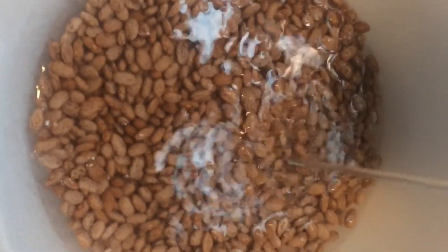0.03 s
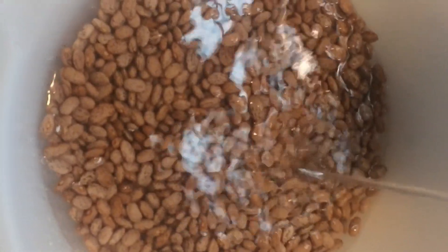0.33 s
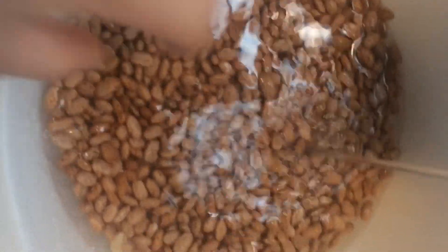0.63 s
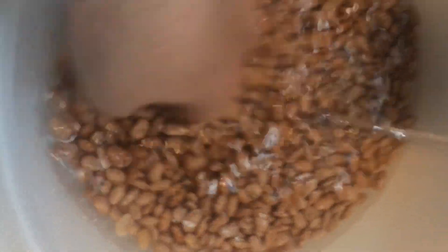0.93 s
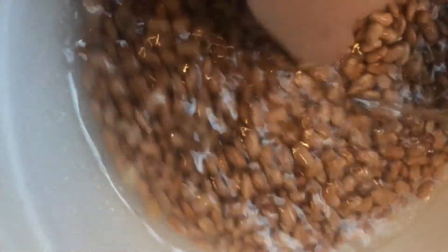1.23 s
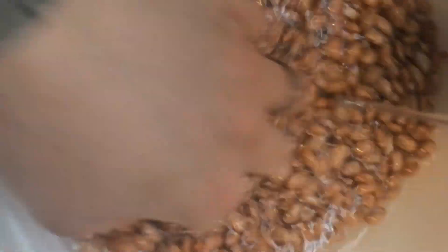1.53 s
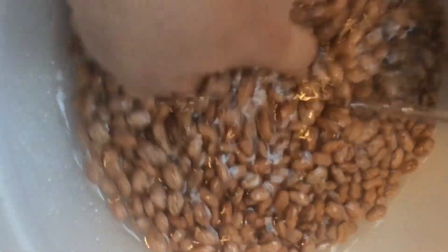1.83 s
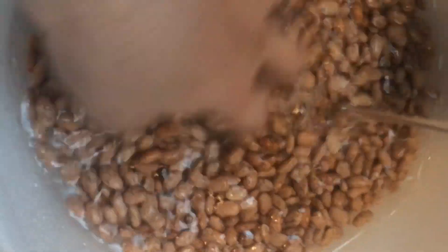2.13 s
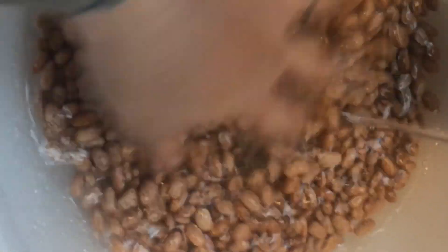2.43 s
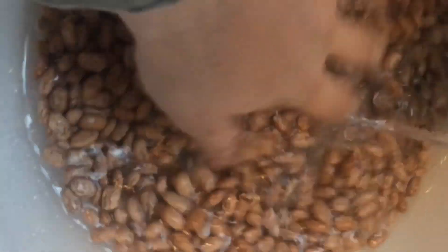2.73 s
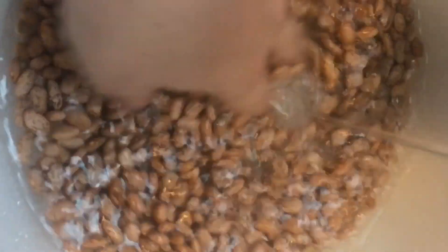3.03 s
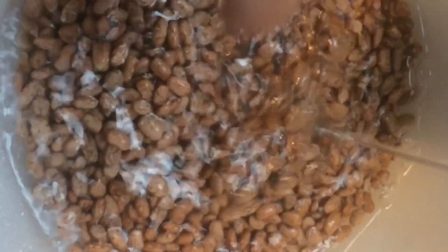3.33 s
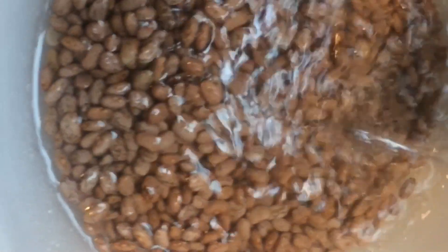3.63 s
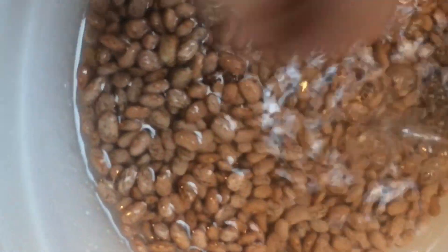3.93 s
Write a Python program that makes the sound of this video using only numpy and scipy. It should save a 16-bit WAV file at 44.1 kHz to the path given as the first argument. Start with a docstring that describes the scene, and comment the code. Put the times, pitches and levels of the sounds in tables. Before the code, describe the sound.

Close up in a kitchen, tap water trickles and spits into a plastic tub of beans. Midway, a hand swirls the wet beans with a dense rattle and soft bumps, then the stream carries on alone.

```python
"""A kitchen: a thin stream of tap water falls into a plastic tub of dried beans, spitting and plopping. The
splash is a spray of tiny ringing bubbles, over the drumming of the stream that rings the tub. From about 0.9 to
3.3 s a hand stirs the beans: they rattle, the water sloshes and the tub is bumped. The hollow of the tub
colours water and beans; room tone and a faint mains hum sit underneath."""
import sys
import numpy as np
from scipy import signal
from scipy.fft import rfft, irfft
from scipy.io import wavfile

SR = 44100
rng = np.random.default_rng(int(sys.argv[2]) if len(sys.argv) > 2 else 0)


def wav_record(signal):
    """Record a signal, one row per channel, as 16-bit PCM in the file named by sys.argv[1]."""
    frames = np.transpose(np.atleast_2d(signal))
    bounded = np.clip(frames, -1, 1)
    # unit amplitude maps onto the largest positive 16-bit level
    quanta = np.round(bounded * 32767).astype(np.int16)
    wavfile.write(sys.argv[1], SR, quanta)


N = 176400
T = np.arange(N) / SR
CUTOFF_HZ = 16000

# fader of the splashing stream: (time [s], level [dB])
STREAM_FADER = [(0, -31), (.09, -29.5), (.14, -30.5), (.23, -32), (.3, -38.5), (.42, -32), (.53, -31.5),
                (.57, -33.5), (.62, -32.5), (.73, -33.5), (.82, -40.5), (.9, -33.5), (3.2, -30.5),
                (3.3, -31), (3.5, -38), (3.79, -28), (3.87, -45.5), (3.97, -31)]
# tone of the splash: (frequency [Hz], level per octave [dB])
STREAM_COLOUR = [(250, -22), (450, -42), (600, -10), (1000, -1), (1700, 0), (2600, 3), (4000, 6.5),
                 (5000, -0.5), (7000, 0), (11000, 1), (16000, -9)]
# sharp spits: (time [s], level [dB], pitch [Hz], sweep [octaves per snap width], knock level [dB])
POPS = [(0.0979, -10.0, 7800.0, 0.5, -22.0), (0.2097, -14.0, 9100.0, 0.9, -21.0),
        (0.3841, -12.0, 11300.0, 0.5, -28.0), (0.4492, -11.0, 9600.0, 0.6, -21.0),
        (0.4847, -6.0, 6900.0, 0.7, -14.0), (0.4955, -14.0, 5800.0, 0.6, -16.0),
        (0.5077, -14.0, 10300.0, 0.6, -30.0), (0.6159, -5.0, 7300.0, 0.4, -18.0),
        (0.6475, -6.0, 7400.0, 0.6, -21.0), (0.8623, -11.0, 6700.0, 1.0, -18.0),
        (0.8769, -11.0, 7200.0, 0.3, -29.0), (0.9015, -9.0, 6000.0, 0.8, -11.0),
        (1.751, -1.0, 8100.0, 0.4, -17.0), (1.7714, -9.0, 9100.0, 0.5, -19.0),
        (2.1747, -6.0, 6400.0, 0.4, -22.0), (2.3599, -5.0, 10100.0, 0.4, -19.0),
        (2.4995, -8.0, 5900.0, 0.5, -16.0), (2.6152, -7.0, 8200.0, 0.9, -16.0),
        (2.628, -2.0, 10800.0, 0.4, -18.0), (2.7815, -8.0, 6500.0, 0.5, -15.0),
        (3.0344, -8.0, 8400.0, 0.6, -28.0), (3.196, -1.0, 8500.0, 0.4, -15.0),
        (3.4029, -6.0, 7200.0, 0.4, -23.0), (3.4594, -5.0, 8100.0, 0.5, -30.0),
        (3.6081, 1.0, 9800.0, 0.5, -16.0), (3.6285, -9.0, 10900.0, 0.6, -19.0),
        (3.7658, -6.0, 5300.0, 0.8, -7.0), (3.9439, -4.0, 8600.0, 1.0, -10.0)]
POP_TRIM_DB, TICK_DB, SNAP_WIDTH_S = -2, 9, 0.000247
# larger air pockets closing: (time [s], level [dB], pitch [Hz])
PLOPS = [(0.0346, -15, 780), (0.259, -9, 1180), (0.4867, -8, 1340), (0.6335, -3.5, 850), (0.7149, -3, 950),
         (0.863, -9, 1070), (0.9026, -12, 970), (0.9239, -10, 940), (1.0266, -3.5, 800),
         (1.1836, -9.5, 1240), (1.3094, -7, 990), (1.5422, -1, 1310), (1.6173, -5.5, 940),
         (1.6402, -8, 1300), (1.7356, -9.5, 900), (1.7953, -13, 710), (1.8606, -8, 1170),
         (2.1433, -5.5, 1250), (2.1754, -7.5, 764), (2.3377, -7, 806), (2.3908, -3, 860),
         (2.4832, -2.5, 965), (2.639, -12, 1330), (2.71, -4.5, 1340), (3.167, -3, 1340),
         (3.6007, -3.5, 1270), (3.6615, -5.5, 1390), (3.7667, -6.5, 1160), (3.8453, -4.5, 1200),
         (3.9441, -4.5, 980)]
PLOP_TRIM_DB, PLOP_CYCLES = -11, 0.86
# deep gulps around the hand: (time [s], level [dB], pitch [Hz])
GULPS = [(0.999, -41, 292), (1.777, -25.5, 290), (1.795, -29, 294), (2.249, -34, 295), (2.49, -52, 270)]
# single bubbles that ring out: (time [s], level [dB], pitch [Hz], swell [cycles])
PINGS = [(0.2001, -16.0, 3150.0, 3.0), (0.2591, -19.0, 6700.0, 6.8), (0.5318, -17.0, 3360.0, 3.5),
         (0.6157, -9.0, 7000.0, 2.8), (0.6792, -12.0, 2570.0, 2.0), (0.6974, -14.0, 2820.0, 2.5),
         (0.7129, -15.0, 3050.0, 2.2), (1.878, -10.0, 3540.0, 2.0), (2.1746, -12.0, 6300.0, 5.1),
         (2.9274, -13.0, 3880.0, 5.9), (2.9371, -12.0, 2650.0, 5.7), (2.9807, -10.0, 2900.0, 2.2),
         (3.4029, -12.0, 7250.0, 3.6), (3.7657, -8.0, 3800.0, 2.7)]
# upper ringing modes of the tub, struck by the stream: (frequency [Hz], level [dB], t60 [s])
UPPER_TUB_MODES = [(618, -14, 0.051), (1130, -7.5, 0.079), (1217, -1.5, 0.057), (1425, -8.5, 0.073),
                   (2198, -4, 0.069), (2273, -3.5, 0.051), (2850, 1.5, 0.018), (3860, -9, 0.024)]
# fader of the stream's drumming on those modes: (time [s], level [dB])
PATTER_FADER = [(0, -31.5), (.3, -44), (.8, -35), (1.2, -45), (2.4, -38.5), (3.1, -44.5), (3.3, -30.5),
                (3.5, -34.5), (3.8, -32.5), (3.88, -35.5), (3.97, -27.5)]
# the stream's hardest hits on the tub's upper modes: (time [s], level [dB], boost of the upper modes [dB])
BLOWS = [(0.082, -35, 13), (0.602, -19, 1.5), (0.679, -24, 5), (3.166, -22, 6.5), (3.282, -16.5, -1.5),
         (3.314, -26, 6), (3.348, -20.5, 3.5), (3.384, -25.5, 11.5), (3.42, -19.5, -3), (3.539, -21.5, 4.5),
         (3.563, -23.5, 9), (3.6, -23.5, 6.5), (3.646, -26.5, 0.0), (3.661, -28.5, 10), (3.677, -20.5, -8),
         (3.711, -16.5, 0), (3.742, -26.0, 1), (3.766, -17, -2), (3.785, -28, 1), (3.801, -21.5, 1.5),
         (3.844, -16, -18), (3.928, -27, 3), (3.942, -28, 12), (3.984, -25, -2)]

# fader of the bean rattle: (time [s], level [dB])
STIR_FADER = [(0, -36.5), (.86, -40), (.96, -33.5), (1.12, -29), (1.25, -32), (1.3, -30.5), (1.53, -27),
              (1.68, -30.5), (1.78, -29), (1.9, -31.5), (1.99, -25), (2.14, -33), (2.24, -32.5),
              (2.46, -28), (2.54, -24), (2.6, -31.5), (2.66, -25), (2.73, -32.5), (2.8, -21), (2.88, -28),
              (2.94, -26.5), (3.03, -27.5), (3.22, -30), (3.45, -40.5), (4, -46)]
# tone of the rattle: (frequency [Hz], level per octave [dB])
RATTLE_COLOUR = [(300, -18.5), (600, -12.5), (1100, -4), (1600, 1), (3000, 2.5), (5000, -2), (7000, 0.5),
                 (11000, -12), (16000, -9)]
# tone of the clear bubbles among the beans: (frequency [Hz], level per octave [dB])
BLIP_COLOUR = [(900, 6.5), (1700, 6.5), (3000, 7.5), (4200, 6.5), (5200, -17), (9000, -30)]
# fader of the water sloshing round the hand: (time [s], level [dB])
SLOSH_FADER = [(0, -60), (.88, -44.5), (1.01, -29.5), (1.12, -34.5), (1.24, -41), (1.4, -35), (1.6, -36),
               (1.7, -37.5), (1.79, -28), (1.9, -40), (2.02, -34.5), (2.14, -35), (2.27, -32.5),
               (2.56, -29.5), (2.72, -45), (2.82, -41), (3.12, -32.5), (3.4, -43.5), (4, -51)]
# tone of the slosh: (frequency [Hz], level per octave [dB])
SLOSH_COLOUR = [(200, -30), (270, 0.5), (330, -5), (430, -13.5), (600, -0.5), (900, 2), (1400, 7),
                (2200, -1)]
# fingers pushing through: (time [s], length [s], level [dB], centre pitch [Hz])
SWISHES = [(0.949, 0.026, -28, 2600), (1.305, 0.024, -32, 4000), (1.516, 0.09, -31, 1960),
           (2.233, 0.041, -28, 1730), (2.542, 0.061, -30.5, 1980), (2.804, 0.082, -32, 2350),
           (2.927, 0.049, -24.5, 2920)]
# the hand bumps the tub: (time [s], level [dB])
BUMPS = [(0.382, -43), (0.896, -34), (1.778, -31.5), (1.985, -41), (2.229, -33.5), (2.289, -37),
         (2.822, -31), (3.08, -30)]
# low modes of the filled tub: (frequency [Hz], level [dB], t60 [s])
TUB_MODES = [(53, -4, 0.28), (76.5, -2, 0.23), (101.5, 8, 0.14), (127, -20, .12)]
# low end of the stirred mass: (frequency [Hz], level per Hz [dB])
RUMBLE_COLOUR = [(20, -30), (35, -41), (50, -6), (85, 2.5), (125, 1), (160, -9), (200, -10), (400, -23),
                 (2000, -70)]

# air resonances of the tub: (frequency [Hz], width [Hz], level [dB])
HOLLOW_MODES = [(295, 57, -4), (588, 62, 9.5), (743.6, 6.8, 4.5), (897, 25, 0.5), (1134, 36, -9.5),
                (1205, 114, -2), (2226, 43, -6)]
WALLS_T60_S, KITCHEN_T60_S, KITCHEN_DB = 0.026, 0.18, -16.5
# room tone of the kitchen: (frequency [Hz], level per Hz [dB])
ROOM_COLOUR = [(20, -22), (50, -9), (80, 5), (125, -12), (160, -3), (300, -12.5), (1000, -2), (4000, -17),
               (16000, -43)]
ROOM_DB, HUM_HZ, HUM_DB = -48.5, 120, -64


def stream():
    """Each splash of the stream makes a bunch of short-lived bubbles."""
    splashes = bursts(per_s=95, members=22, spread_s=.0022, burst_db=4, member_db=4)
    return level(STREAM_FADER) * grains(*splashes, STREAM_COLOUR, cycles=1.5, rise=.024, count=30)


def pops():
    """Tiny cavities snap open with a lower knock; faint ticks in between follow the stream's level."""
    out = np.zeros(N)
    for (s, db, hz, sweep, knock_db), (turn, knock_turn, octaves) in zip(POPS, rng.random((len(POPS), 3))):
        add(out, s - .001, from_db(db + POP_TRIM_DB) * in_tub(snap(hz, sweep, turn), walls_db=-8))
        knock = bubble(2100 * 2 ** octaves, cycles=1.2, rise=.1, turn=knock_turn)
        add(out, s - .0005, from_db(knock_db + POP_TRIM_DB) * in_tub(knock))
    flow = level(STREAM_FADER)
    for when, octaves, turn, strength in rng.random((180, 4)):
        tick = snap(7000 * 2 ** octaves, sweep=.51, turn=turn)
        add(out, when * N / SR, from_db(TICK_DB) * strength * flow[int(when * N)] * tick)
    return out


def plops():
    """Larger pockets of air ring briefly; the deepest gulp around the hand."""
    out = np.zeros(N)
    for s, db, hz in PLOPS:
        plop = in_tub(bubble(hz, PLOP_CYCLES, rise=.049, turn=rng.random()))
        add(out, s - PLOP_CYCLES / hz, from_db(db + PLOP_TRIM_DB) * plop)  # peaks on the cue
    for s, db, hz in GULPS:
        add(out, s, from_db(db) * bubble(hz, cycles=1.17, rise=.011, turn=rng.random()))
    return out


def pings(trim_db=-1):
    """Freed bubbles ring with a clear, slightly rising note."""
    out = np.zeros(N)
    for s, db, hz, cycles in PINGS:
        ping = bubble(hz, cycles, rise=.044, turn=rng.random())
        add(out, s - cycles / hz, from_db(db + trim_db) * in_tub(ping, walls_db=-8))
    return out


def patter():
    """The stream breaks into quick blows that ring the tub's upper modes."""
    times, db = bursts(per_s=45, members=1, spread_s=.001, burst_db=3.5, member_db=1)
    out, t = np.zeros(N), T[:SR // 10]
    for hz, mode_db, t60 in UPPER_TUB_MODES:
        hits = clicks(times, from_db(db + mode_db + rng.normal(0, 2.8, len(db))))
        out += signal.oaconvolve(hits, ring(t, hz, t60))[:N]
    return level(PATTER_FADER) * rms_one(bass_cut(out))


def blows(trim_db=-3):
    """Hard blows give the tub's upper modes a tighter ring, each with its own brightness."""
    out, t = np.zeros(N), T[:SR // 10]
    for s, db, upper_db in BLOWS:
        for hz, mode_db, t60 in UPPER_TUB_MODES:
            bright_db = upper_db * np.clip(np.log2(hz / UPPER_TUB_MODES[2][0]), 0, 1)
            detuned_hz = hz * (1 + .01 * rng.standard_normal())
            add(out, s, from_db(db + mode_db + bright_db) * ring(t, detuned_hz, .67 * t60))
    return from_db(trim_db) * bass_cut(out)


def bass_cut(x, hz=710):
    """The ringing blows and patter carry little bass."""
    return signal.sosfilt(signal.butter(2, hz, "high", fs=SR, output="sos"), x)


def stirring(rattle_db=-1, blip_db=-10.5):
    """Wet beans knock in a dense rattle, single bubbles ring out and the water sloshes."""
    knocks = bursts(per_s=350, members=10, spread_s=.01, burst_db=2, member_db=3)
    rattle = from_db(rattle_db) * grains(*knocks, RATTLE_COLOUR, cycles=2.6, rise=.04, count=32)
    bubbles = bursts(per_s=110, members=2, spread_s=.01, burst_db=1, member_db=4)
    blips = from_db(blip_db) * grains(*bubbles, BLIP_COLOUR, cycles=6, rise=.05, count=22)
    laps = bursts(per_s=90, members=8, spread_s=.008, burst_db=.5, member_db=.5)
    slosh = grains(*laps, SLOSH_COLOUR, cycles=2.8, rise=.038, count=22)
    return level(STIR_FADER) * (rattle + blips) + level(SLOSH_FADER) * slosh


def swishes(count=70):
    """Water squeezed between the beans frees a cloud of bubbles of similar size."""
    out = np.zeros(N)
    for s, length_s, db, hz in SWISHES:
        cloud = np.zeros(N)
        for when, detune, turn in np.clip(rng.standard_normal((count, 3)), -2, 2):
            blip = bubble(hz * 2 ** (.4 * detune), cycles=2.8, rise=.06, turn=turn)
            add(cloud, s + when * length_s / 3, blip)
        out += from_db(db) * cloud * np.sqrt(length_s * SR / np.sum(cloud ** 2))
    return out


def bumps(attack_s=.029):
    """Soft pushes set the heavy tub ringing low."""
    out, t = np.zeros(N), T[:SR // 2]
    attack = 1 - np.exp(-t / attack_s)
    for s, db in BUMPS:
        for hz, mode_db, t60 in TUB_MODES:
            add(out, s, from_db(db + mode_db) * attack * ring(t, hz, t60, rng.random()))
    return out


def rumble(trim_db=-23.5):
    """The stirred mass rumbles, riding the same fader as the rattle."""
    return from_db(trim_db) * level(STIR_FADER) * noise(RUMBLE_COLOUR)


def tub_ring(trim_db=-29):
    """Each plop sets the tub's air ringing, most near its own pitch."""
    out, t = np.zeros(N), T[:SR // 5]
    for s, db, hz in PLOPS:
        for mode_hz, _, _ in HOLLOW_MODES:
            nearness = np.exp(-2 * np.log2(mode_hz / hz) ** 2)
            add(out, s, nearness * from_db(db + trim_db) * ring(t, mode_hz, t60=.11))
    return out


def in_tub(wave, walls_db=-4):
    """Every spot in the tub has its own reflections from the walls."""
    path = from_db(walls_db) * echoes(WALLS_T60_S, delay_s=.00065)[:SR // 20]
    path[0] = 1  # the direct sound
    return signal.fftconvolve(wave, path)


def tub_and_kitchen(x):
    """The hollow of the tub rings and the room throws the sound back."""
    out = x.copy()
    for hz, width_hz, db in HOLLOW_MODES:
        out += from_db(db) * signal.lfilter(*signal.iirpeak(hz, hz / width_hz, fs=SR), x)
    reverb = signal.fftconvolve(out, echoes(KITCHEN_T60_S, delay_s=.0051))[:N]
    return out + from_db(KITCHEN_DB) * reverb


def room_tone():
    """A steady bed of soft noise and faint mains hum."""
    hum = np.sqrt(2) * np.sin(2 * np.pi * HUM_HZ * T)
    return from_db(ROOM_DB) * noise(ROOM_COLOUR) + from_db(HUM_DB) * hum


def bubble(hz, cycles, rise, turn):
    """A sine that swells for `cycles` and dies away while its pitch rises; `turn` is its phase."""
    age = np.arange(int(7 * cycles / hz * SR) + 2) / SR * hz / cycles  # 1 at the peak
    pitch = np.minimum(hz * (1 + rise) ** (np.minimum(age, 3) - 1), .45 * SR)
    return (age * np.exp(1 - age)) ** 2 * np.sin(2 * np.pi * (np.cumsum(pitch) / SR + turn))


def snap(hz, sweep, turn):
    """A brief upward chirp, centred on 1 ms."""
    widths = (T[:SR // 500] - T[SR // 1000]) / SNAP_WIDTH_S
    pitch = np.minimum(hz * 2 ** (sweep * widths), SR / 2)
    return np.exp(-widths ** 2 / 2) * np.sin(2 * np.pi * (np.cumsum(pitch) / SR + turn))


def ring(t, hz, t60, turn=0):
    """One struck mode dying away."""
    return from_db(-60 * t / t60) * np.sin(2 * np.pi * (hz * t + turn))


def bursts(per_s, members, spread_s, burst_db, member_db):
    """Times and levels of small events in bunches; the dB settings scatter their strength."""
    n = int(per_s * N / SR)
    starts = (np.arange(n)[:, None] + 2 * rng.random((n, 1))) / per_s
    times = starts + spread_s * rng.exponential(1, (n, members))
    bunch_db = burst_db * np.minimum(rng.standard_normal((n, 1)), np.sqrt(2))
    db = bunch_db + member_db * np.minimum(rng.standard_normal((n, members)), 2)
    return times.ravel(), db.ravel()


def grains(times, db, spectrum, cycles, rise, count):
    """Deal small events to `count` pitches spread evenly over the octaves of a spectrum; rms 1."""
    pitches = np.geomspace(spectrum[0][0], min(spectrum[-1][0], CUTOFF_HZ), count)
    dealt, out = rng.permutation(len(times)) % count, np.zeros(N)
    sizes = from_db(db) * rng.choice([-1, 1], len(times))
    for k, hz in enumerate(pitches):
        hits = clicks(times[dealt == k], sizes[dealt == k])
        grain = in_tub(bubble(hz, cycles, rise, rng.random()))
        out += colour(spectrum, hz) * rms_one(signal.oaconvolve(hits, grain)[:N])
    return rms_one(out)


def clicks(times, sizes):
    """A track of impulses; late ones wrap round to the start."""
    return np.bincount((times * SR).astype(int) % N, sizes, N)


def echoes(t60, delay_s):
    """Dense reflections dying away; unit energy."""
    t = T[:SR // 2]
    tail = rng.standard_normal(len(t)) * from_db(-60 * t / t60) * (t > delay_s)
    return tail / np.sqrt(np.sum(tail ** 2))


def noise(points):
    """Coloured noise of rms 1."""
    hz = np.arange(N // 2 + 1) * SR / N
    return rms_one(irfft(rfft(rng.standard_normal(N)) * colour(points, hz), N))


def colour(points, hz):
    """Gain at a frequency from (frequency [Hz], level [dB]) rows."""
    f, db = np.transpose(points)
    return from_db(np.interp(np.log(hz + 1e-9), np.log(f), db))


def level(rows):
    """Fader gain from (time [s], level [dB]) rows."""
    return from_db(np.interp(T, *np.transpose(rows)))


def add(out, s, wave):
    """Mix a short sound in at a time."""
    i = int(np.clip(s * SR, 0, N - 1))
    out[i:i + len(wave)] += wave[:N - i]


def from_db(db):
    """Decibels to gain."""
    return 10 ** (np.asarray(db) / 20)


def rms_one(x):
    """Scale to rms 1."""
    return x / np.sqrt(np.mean(x ** 2) + 1e-20)


def scene():
    """The mono mix: water and beans in the tub, over its low end and the room tone."""
    bed = room_tone()
    wash = from_db(.5) * (stream() + stirring()) + swishes() + patter()
    accents = pops() + plops() + blows() + pings() + tub_ring()
    return (tub_and_kitchen(wash + accents) + bumps() + rumble() + bed)[None]


def record(dry):
    """The highest peaks are rounded and the top is cut."""
    rounded = 1.5 * np.tanh(dry / 1.5)
    return signal.sosfilt(signal.ellip(10, .1, 80, CUTOFF_HZ, fs=SR, output="sos"), rounded)


dry = scene()
out = record(dry)
wav_record(out)
```